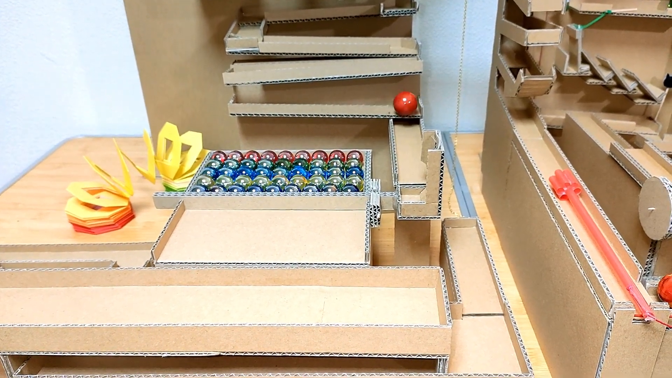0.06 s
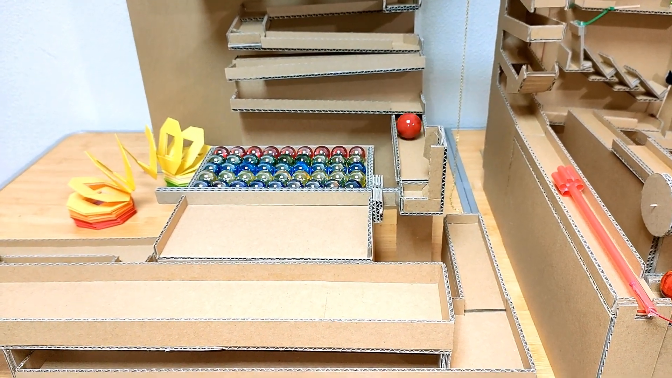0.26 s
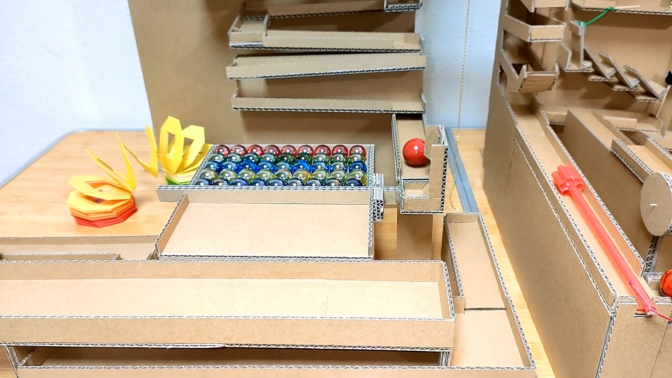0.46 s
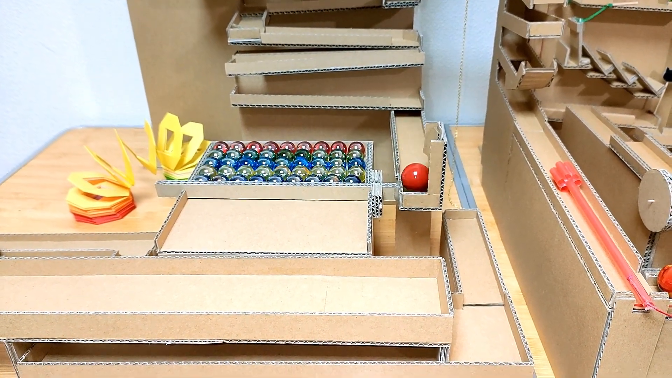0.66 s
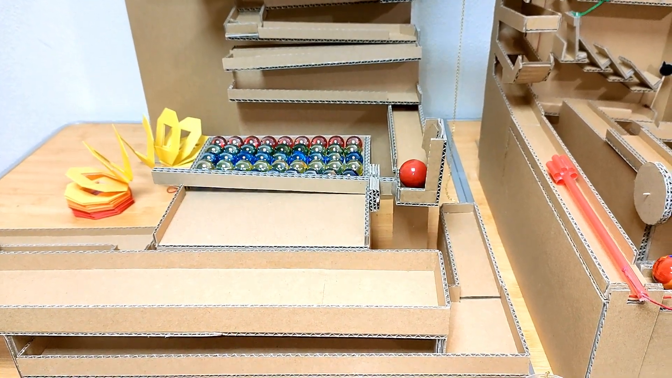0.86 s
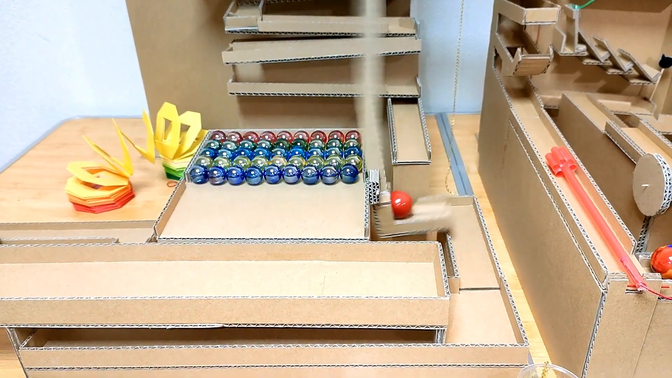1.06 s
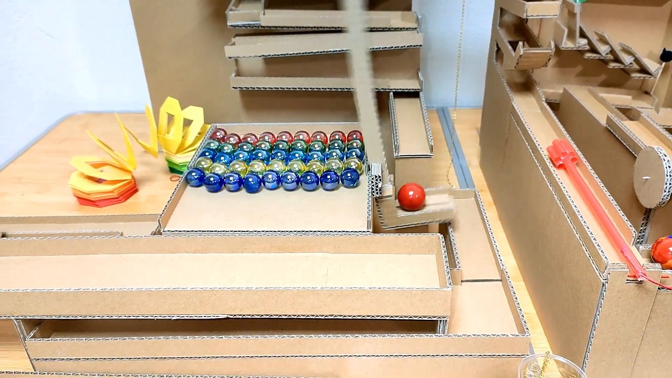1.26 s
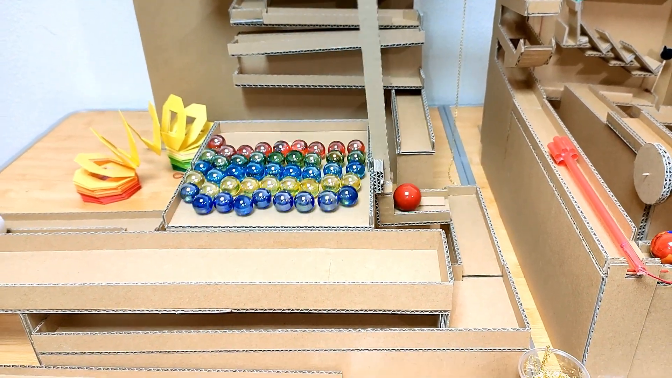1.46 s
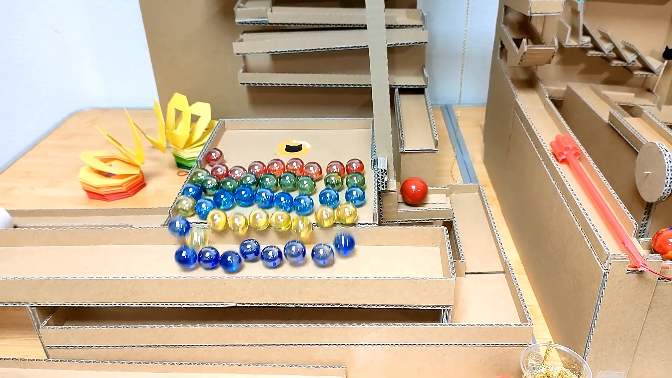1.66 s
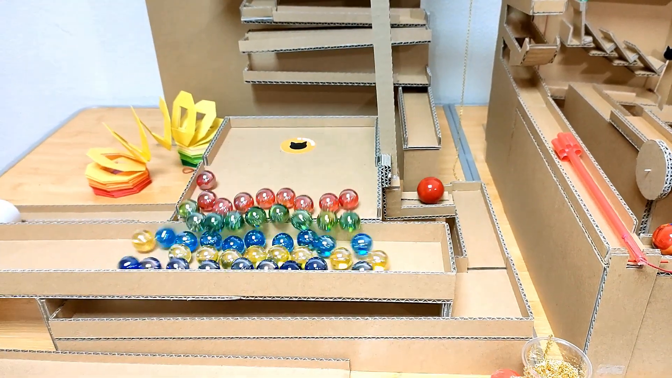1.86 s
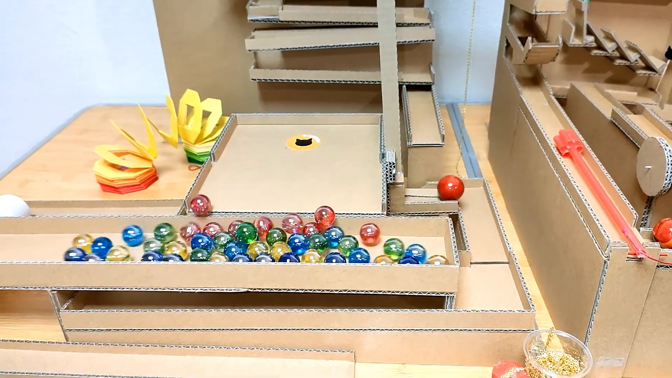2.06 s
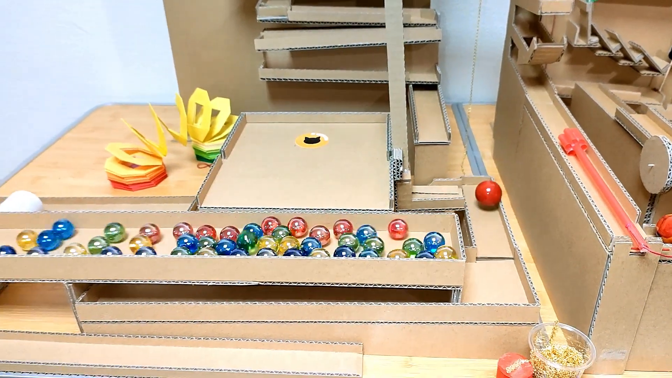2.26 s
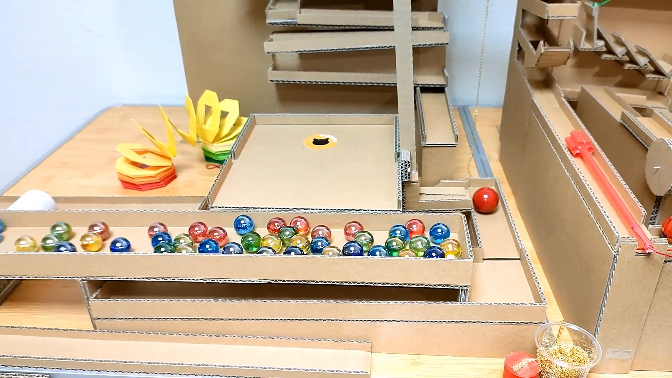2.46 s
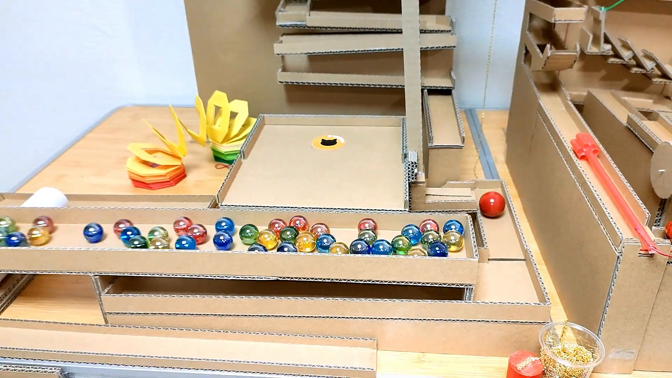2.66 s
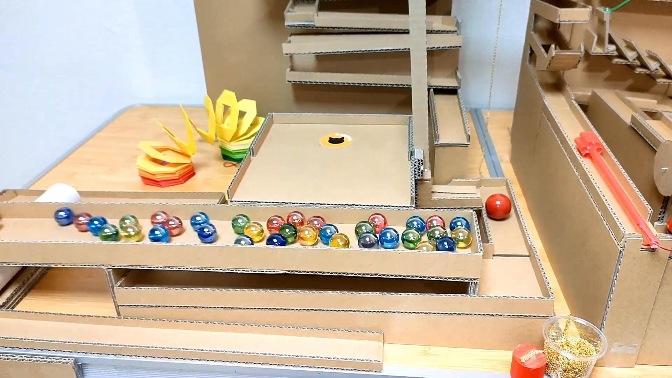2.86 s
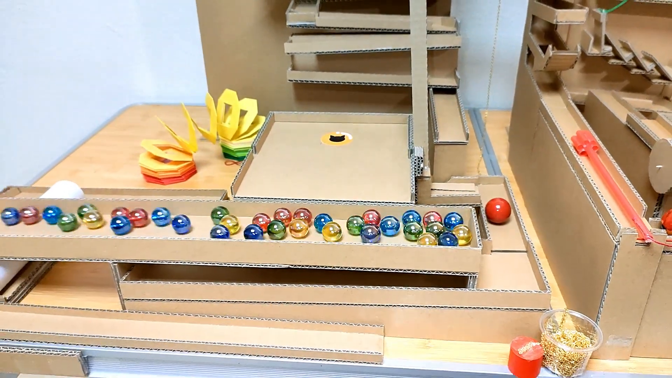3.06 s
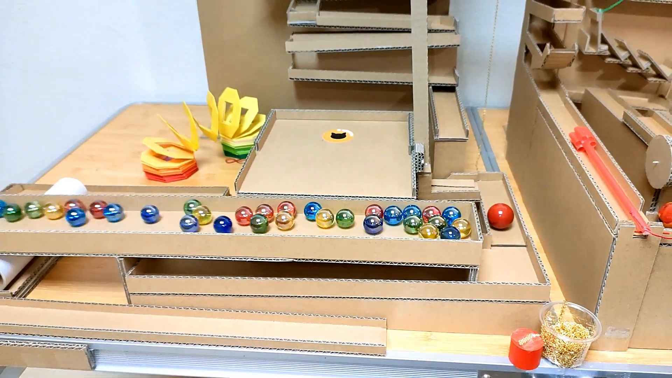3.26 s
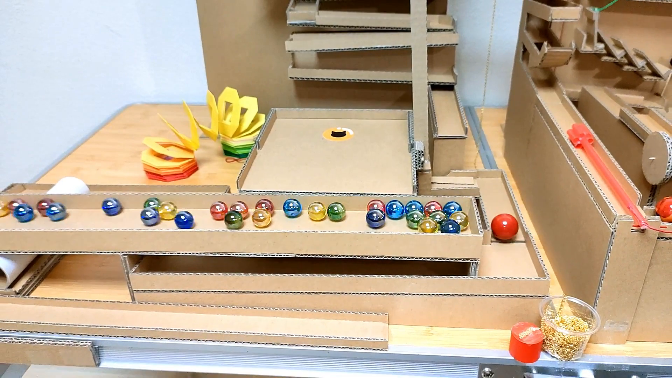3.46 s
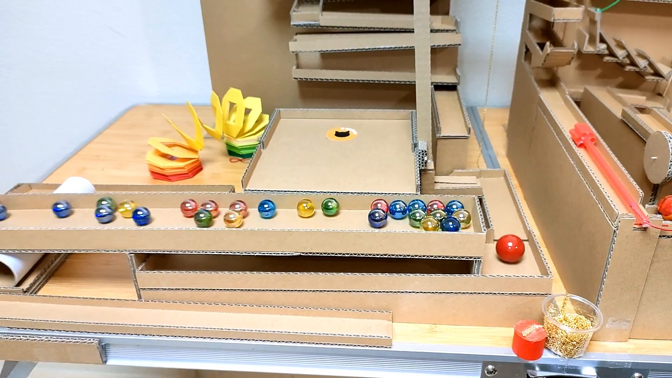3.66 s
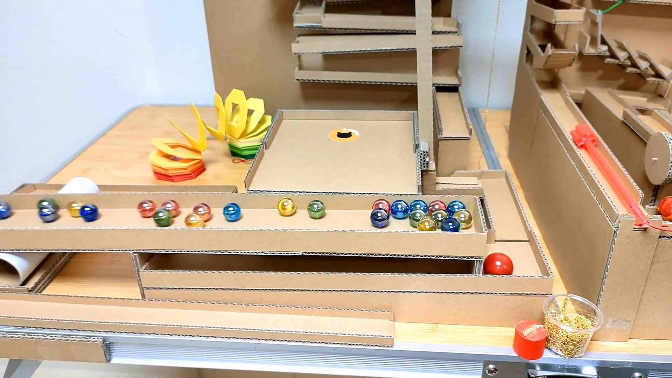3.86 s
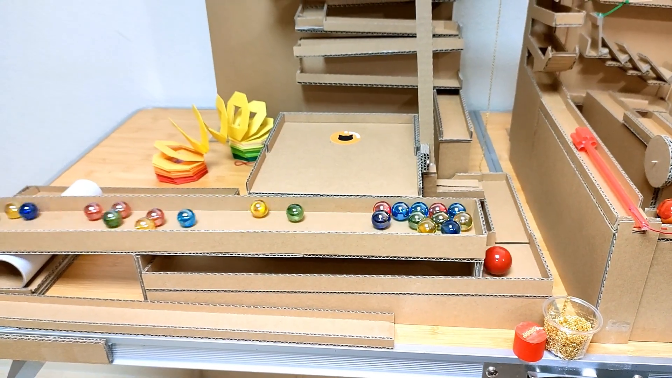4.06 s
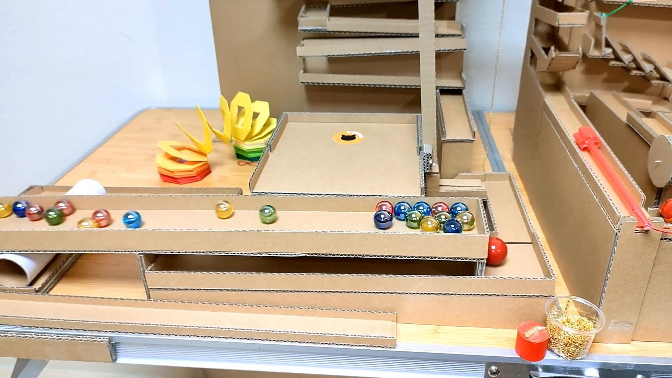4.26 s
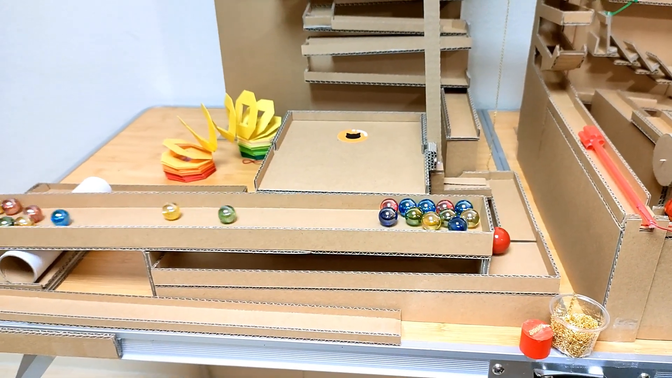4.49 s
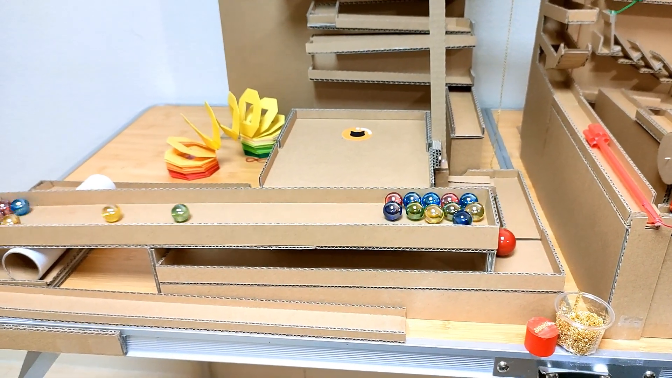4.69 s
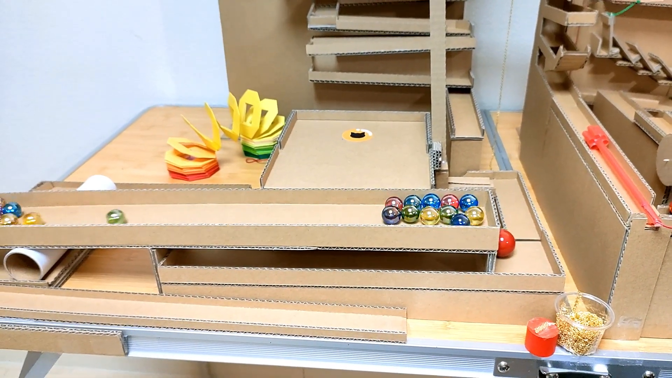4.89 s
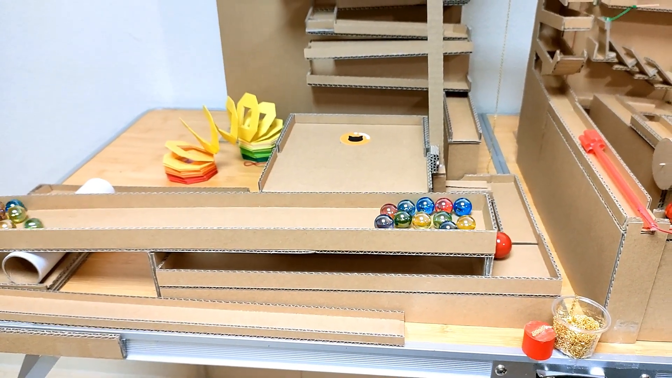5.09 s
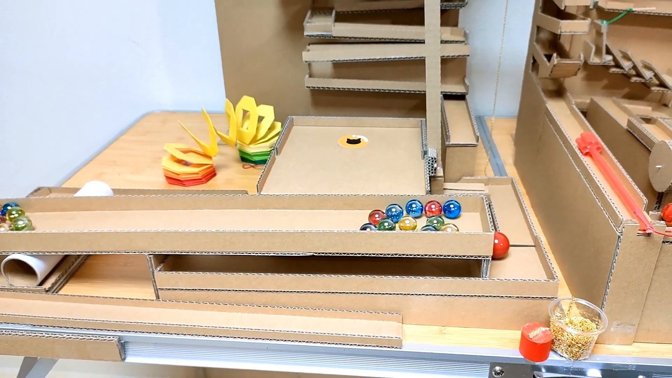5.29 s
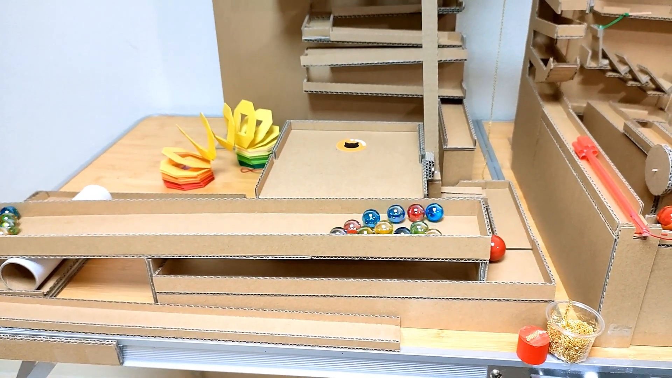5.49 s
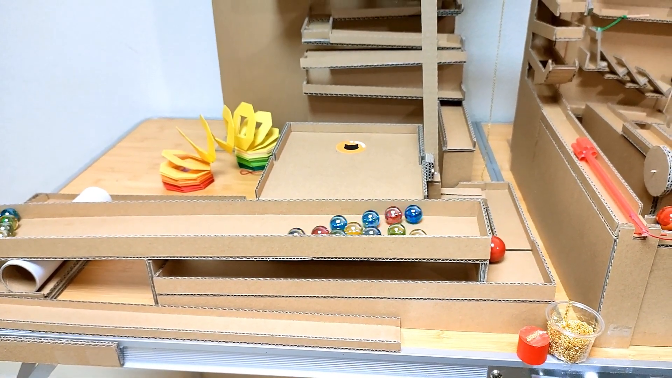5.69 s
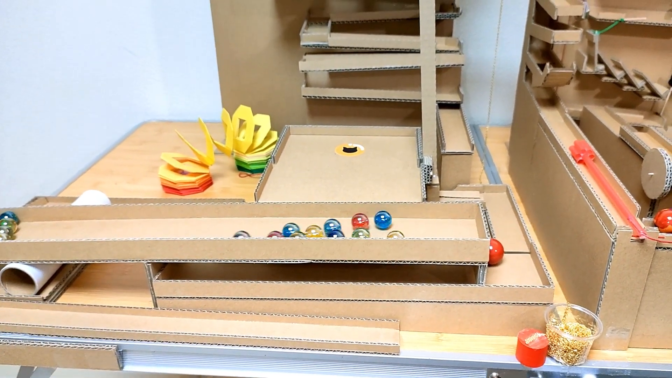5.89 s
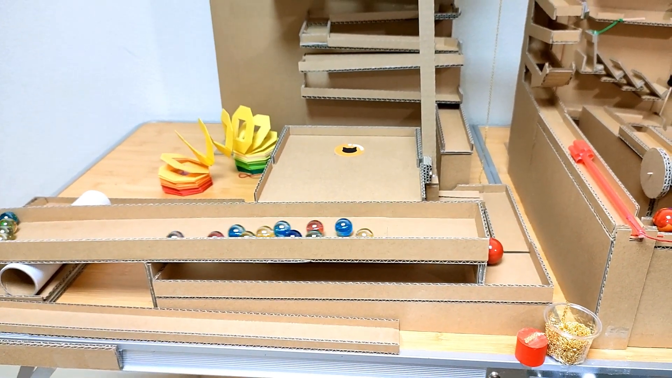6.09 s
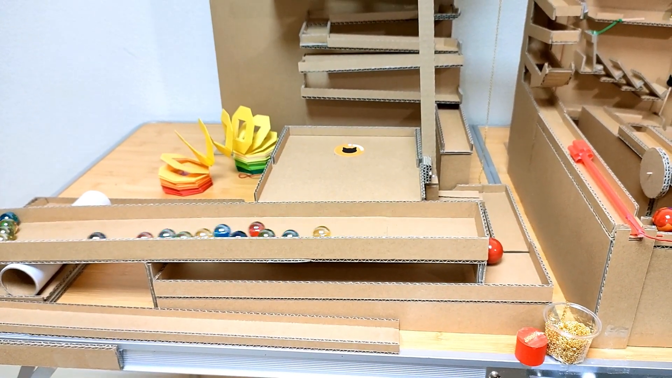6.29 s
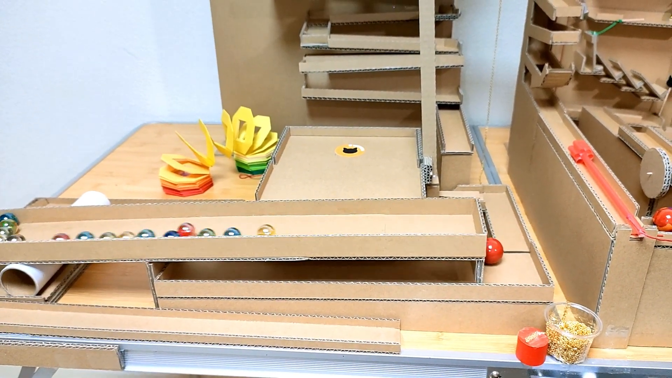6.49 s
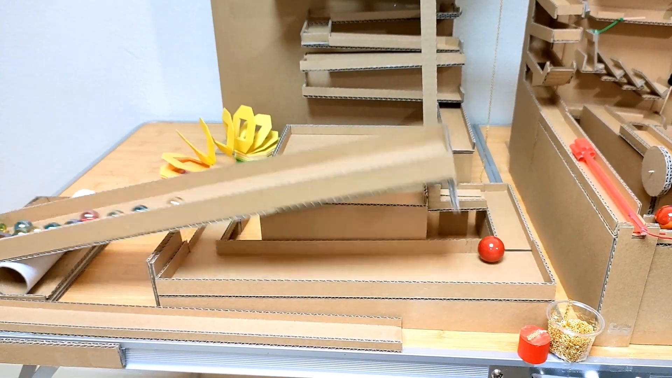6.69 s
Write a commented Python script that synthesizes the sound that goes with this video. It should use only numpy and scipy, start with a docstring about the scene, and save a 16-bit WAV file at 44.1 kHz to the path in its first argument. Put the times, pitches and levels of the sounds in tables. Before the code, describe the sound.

A heavy ball knocks hollowly along a cardboard run and tips a gate. Rows of glass marbles roll down a tray with a swelling hum and spill into a chute in a loud, dense clatter over a low boom. They rumble on and pile up with short bright clicks, which thin out to faint rolling and a few last taps. The sound is close, in a small room.

```python
"""Glass marbles spill down cardboard chutes in a small room, near a phone-sized recorder.
First a heavy ball knocks along the run and tips a gate. From 1.3 s rows of marbles roll down a tray,
then spill out near 1.8 s: blows and rolling ring the cardboard, and the air in a big box booms.
From about 2.9 s they pile up on the right, glass on glass giving short bright clicks. The last ones
roll off with a thin whistle. All along, the recorder's noise suppressor cuts the quiet ends of sounds."""
import sys
import numpy as np
from scipy import signal
from scipy.fft import irfft
from scipy.io import wavfile
from scipy.ndimage import uniform_filter1d

SR = 44100
rng = np.random.default_rng(int(sys.argv[2]) if len(sys.argv) > 2 else 0)


def generate_wav(signal):
    """Clip the signal to [-1, 1] and save it as 16-bit WAV at the path in sys.argv[1]."""
    frames = np.transpose(np.atleast_2d(signal))
    scaled = np.clip(frames, -1, 1) * 32767
    pcm = np.round(scaled).astype(np.int16)
    wavfile.write(sys.argv[1], SR, pcm)


N = 297234
TIME = np.arange(N) / SR

# Room echoes. Each row: pitch in Hz, seconds to fade by 60 dB.
ROOM_FADE = [(150, 0.46), (600, 0.34), (2000, 0.24), (5000, 0.3), (12000, 0.2)]
# Slow rolling over the cardboard's ridges. Each row: time in seconds, whistle level in dB.
WHISTLE = [(5.75, -87), (5.92, -78.5), (6.5, -69), (6.74, -45)]
# Hum of the sloping tray. Each row: pitch in Hz, width in Hz, level in dB.
TRAY_TONES = [(665, 290, -8.5), (1250, 500, -3)]
# The chute's end wall. Each row: pitch in Hz, width in Hz, level in dB relative to the click.
WALL_TONES = [(1140, 31, -24), (2290, 150, -16.5)]
# Hiss of the paper surface. Each row: pitch in Hz, width in Hz, level in dB.
PAPER_TONES = [(2350, 1800, 23), (3690, 1070, 15), (4600, 670, 3.5), (5190, 6700, -24), (6600, 380, -19)]
# Ringing of the chute and tray. Each row: pitch in Hz, width in Hz, level in dB.
CARDBOARD_TONES = [(252, 20.7, -7), (324, 31.6, -4.5), (439.5, 34, -3.5), (532, 50.5, -6.5), (644, 64, 0.5),
                   (739, 72, -1.5), (904.3, 73, 1), (1024.6, 19.4, -12), (1160, 122, 0.5), (1433, 198, 3.5),
                   (1647, 344, 8), (2066, 263, 5.5), (2303, 86, 0)]
# The rolling marbles. Each row: time in seconds, cardboard rumble in dB, box boom in dB.
ROLLING = [(0.0, -107, -100), (1.12, -69, -83), (1.33, -43.5, -58), (1.62, -27, -53), (1.68, -34, -59),
           (1.78, -15, -67), (1.88, -14, -82), (2.242, -17.5, -43), (2.42, -22.5, -35), (2.581, -29, -41.5),
           (2.75, -29, -59.5), (2.92, -22, -48), (3.26, -26.5, -40.5), (3.46, -34.5, -56.5),
           (3.6, -23, -44), (3.76, -36.5, -40), (3.899, -32, -77), (4.03, -33.5, -47), (4.7, -37.5, -67),
           (5.15, -44, -58), (5.3, -59.5, -67), (5.52, -52, -64.5), (5.951, -39.5, -66), (6.74, -38, -68)]
# Brightness of the rumble. Each row: time in seconds, dB per octave above 900 Hz.
RUMBLE_TILT = [(0, -4.5), (1.3, -5.5), (1.6, -2), (2.4, -10), (2.7, -9), (4.5, -6.5), (5.4, 0), (6, -13),
               (6.74, -4.5)]
# The heavy ball jostles loose parts. Each row: start and length in seconds, rattle and boom in dB.
RATTLES = [(0.0, 0.018, -52, -57), (0.305, 0.15, -44.5, -43), (0.647, 0.068, -44, -53.5),
           (0.796, 0.063, -65, -64), (1.196, 0.041, -28.5, -41.5)]
# Blows on cardboard. Each row: start in seconds, level in dB, pitch of the struck spot in Hz,
# paper scuff in dB relative to the blow, left over right in dB.
KNOCKS = [(0.018, -38.5, 322, -30, 3), (0.282, -36.5, 680, -22, -9), (0.29, -19.5, 615, -32, 0),
          (0.31, -16, 590, -25, 3), (0.369, -17, 684, -18, 3), (0.404, -22, 549, -40, -3.5),
          (0.447, -27.5, 617, -27, 3), (0.64, -31, 770.5, -21, 1), (0.687, -29, 440, -21, 3),
          (0.786, -43.5, 736, -11, -3), (0.805, -48, 700.1, -0.5, 1), (0.999, -63, 686, -3, -5),
          (1.074, -38.5, 595, -12.5, 0), (1.181, -16.5, 580, -37, 5.5), (1.197, -13, 580, -29, 0),
          (1.219, -16, 655, -47, -3), (1.393, -22.5, 302, -43, 2), (1.605, -19, 725, -46, -1),
          (1.651, -11, 1090, -49, -1), (1.6625, -18, 1150, -43, 12), (1.6702, -6, 1380, -48, 0),
          (1.6735, -16, 1350, -38, -4), (1.71, -6.5, 1210, -35, -4), (1.717, -10.5, 745, -6, 3),
          (1.7204, -5.5, 800, -46, 4), (1.743, -4, 1500, -15, -1), (1.7448, -6.5, 1320, -32, 2),
          (1.758, -11, 1180, -26, -3), (1.7627, -9.5, 1250, -19, -2), (1.818, -7, 920, -33, -5),
          (1.8375, -2, 1020, -23, -1), (1.897, -3, 840, -22.5, 3), (1.934, -19, 800, -35, 1),
          (1.947, -7, 1100, -34, 0), (1.923, -3.5, 1096, -35, 0.5), (1.941, -10, 910, -28, 0),
          (2.0175, -6.5, 930, -22, 0), (2.06, -16, 1020, -24, 3), (2.073, -3, 1160, -49, -1),
          (2.107, -17, 586, -37, -1), (2.127, -6.5, 694, -30, 0), (2.221, -10, 920, -15, -1),
          (2.24, -8.5, 900, -23, 1.5), (2.254, -4, 840, -25, -4), (2.181, -5.5, 785, -14, 1.5),
          (2.295, -7, 800, -13.5, 1.5), (2.328, -8, 1010, -18, -2), (2.383, -2.5, 990, -18, 1.5),
          (2.694, -20.5, 665, -28, 1), (2.782, -41, 800, -22, 5), (2.861, -26, 902, -10, -1),
          (2.915, -13.5, 945, -14, -3), (2.941, -13, 800, -35, 4), (2.957, -14.5, 936, -25, -2),
          (3.008, -27, 711, -21, 1), (3.047, -19.5, 875, -22, -4), (3.077, -11.5, 880, -30, 2),
          (3.213, -14.5, 900, -32, 2), (3.293, -26, 900, -30, -2), (3.452, -20.5, 903, -12, 4),
          (3.472, -20, 870, -24, -4), (3.574, -24, 1170, -5, 2), (3.649, -23, 1390, -20, 2),
          (3.748, -23.5, 660, -18, 3), (3.888, -20, 1160, -8, 2), (3.944, -16, 580, -12, 2.5),
          (4.066, -34, 1160, -33, 9), (4.142, -26, 2250, -5, -2), (4.179, -28, 1170, -27, -3),
          (4.235, -23.5, 1000, -41, -2), (4.445, -25.5, 2250, -34, -1), (4.521, -27.5, 710, -26, 1.5),
          (4.696, -19.5, 786, -10.5, 1.5), (4.801, -44, 1130, -28, 0), (5.012, -33.5, 475, -13, 3),
          (5.196, -31.5, 2110, -24, 7), (5.23, -24.5, 1050, -15, 1.5), (5.485, -36.5, 630, -16, 4),
          (5.484, -36, 2350, -25, -4), (5.882, -36, 870, -26, -1), (6.007, -40.5, 900, -35, 11),
          (6.064, -34, 2230, -29, -4), (6.186, -31.5, 905, -26, -1), (6.419, -27.5, 1100, -17.5, -2),
          (6.588, -25.5, 2350, -5, -5)]
# Glass on glass. Each row: start in seconds, level in dB, rough pitch in Hz, left over right in dB.
CLICKS = [(1.717, -37, 4320, -28), (1.728, -36, 4340, 0), (1.7866, -28, 4630, -2.5),
          (1.8086, -38, 4600, -1), (1.8318, -29, 3200, 7.5), (1.8645, -21, 4300, 3), (1.896, -12, 4470, 5),
          (1.931, -35, 4320, 1), (2.032, -36, 4430, 5), (2.008, -12.5, 4660, 0), (2.0795, -17, 6500, -5),
          (2.0844, -20, 4090, -4), (2.145, -29, 4630, 4), (2.179, -21, 4670, -3), (2.124, -22, 4600, 3),
          (2.233, -39, 4600, 0), (2.292, -32, 4700, -3), (2.426, -38, 3000, 0), (2.62, -39.5, 3820, 2),
          (2.7396, -39.5, 4880, 4), (2.791, -38, 4650, 3), (2.809, -49, 4600, 0), (2.821, -31, 5060, 7),
          (2.9115, -14, 3780, 7), (2.9155, -21, 4300, -4), (2.9495, -20.5, 5340, -9),
          (2.9577, -23, 4930, 15), (3.014, -22, 6570, 7), (3.023, -24, 5540, -17), (3.033, -22, 4420, 12),
          (3.0535, -16.5, 5170, -1), (3.067, -35, 5450, -4), (3.1567, -25, 5940, 0),
          (3.162, -23.5, 6100, -1), (3.1876, -24, 5440, -4), (3.2116, -23.5, 4270, -8),
          (3.2203, -23, 5200, -2), (3.2258, -21, 5110, 5), (3.234, -36, 5940, 2), (3.243, -21, 5100, -1),
          (3.253, -22, 5900, -5), (3.271, -28, 5500, -3.5), (3.278, -28, 5540, 13), (3.2827, -24, 5600, 4),
          (3.34, -32, 5450, -2), (3.324, -30.5, 6200, 4), (3.44, -28, 3880, 6), (3.4534, -24, 6960, -5),
          (3.4611, -19.5, 5460, 1), (3.517, -32, 6200, -8), (3.469, -25, 5400, -3), (3.56, -30, 5600, 2),
          (3.565, -23, 5600, -5.5), (3.5701, -16, 4600, 8.5), (3.5728, -20.5, 5360, -14),
          (3.601, -18.5, 6300, 5), (3.6267, -18, 4560, 2), (3.636, -26, 5000, 4), (3.7118, -20.5, 5700, 1),
          (3.742, -27, 6160, -2), (3.7793, -31, 3850, 1.0), (3.817, -36.5, 6160, -0.5),
          (3.835, -34, 6130, -2), (3.8743, -23, 5240, 3), (3.8849, -13, 5440, 1), (3.935, -20, 3990, -1),
          (4.0006, -26.5, 4250, -2), (4.0614, -14.5, 4320, 4), (4.0647, -38, 6180, 15),
          (4.127, -42, 5650, 0), (4.166, -36, 4600, 1), (4.1428, -28, 6400, 4), (4.1478, -25, 4600, 2),
          (4.177, -18, 5650, 5), (4.179, -32, 6330, -3), (4.2213, -25.5, 4800, -25), (4.224, -27, 4600, 0),
          (4.2272, -30, 4600, 3), (4.2303, -18, 4400, 15), (4.2344, -16.5, 4600, 3),
          (4.358, -23.5, 6980, 8), (4.405, -26.5, 4960, -3), (4.4262, -33, 4300, 16),
          (4.443, -18.5, 5645, 3), (4.48, -32, 4870, 11), (4.506, -28, 6000, -1), (4.551, -21, 4650, 2),
          (4.6, -20.5, 4447, 2.5), (4.6618, -23, 4450, -2), (4.682, -24, 5230, 0), (4.687, -18.5, 6600, 2),
          (4.7088, -18.5, 4460, 0), (4.7304, -19.5, 4250, 0), (4.79, -24, 6120, -0.5),
          (4.792, -16, 4970, 0), (4.9012, -34.5, 4270, 0), (4.933, -37, 4400, 1), (4.9413, -35, 6400, 0),
          (5.021, -19, 6610, 0), (5.051, -28.5, 3740, 10), (5.0607, -33, 4140, -9), (5.126, -28, 4430, 3),
          (5.212, -31, 4270, 0), (5.2292, -17.5, 4340, 0.5), (5.4408, -49, 4370, 1), (5.4708, -45, 4300, 8),
          (5.5218, -32.5, 4400, 1), (5.574, -44.5, 4540, 0), (5.593, -38, 3500, -2),
          (5.6577, -37.5, 4280, 3), (5.738, -46.5, 5200, 3), (5.933, -41, 5200, 9.5),
          (5.967, -44.5, 4550, 3), (6.2457, -39.5, 4600, 0), (6.585, -17.5, 4600, 2.5),
          (6.6723, -21.5, 4280, 1), (6.685, -23, 5060, 4), (6.6985, -20.5, 6360, 0), (6.71, -37, 4600, 7),
          (6.723, -27, 5600, 11)]
# How walls and microphone colour the clicks. Each row: pitch in Hz, gain in dB.
CLICK_COLOUR = [(1500, -2), (2800, -7.5), (4200, -2), (6500, 1.5), (7600, -7.5), (8800, -1), (10500, -9),
                (14500, -13), (15600, -37), (16400, -51)]
# A click and its three ever weaker rebounds. Each entry: level change in dB.
REBOUND_DB = [0, -9, -12, -17]
# When clicks come from the heap. Each row: start and end in seconds.
HEAP_SPANS = [(2.85, 5.8), (6.52, 7)]

HEAP_LAG, TRAY_LAG = 22, -2  # samples by which the left microphone hears clicks late
RUMBLE, BOOM = 0, 1  # which level to read from ROLLING and RATTLES


def gain_of(db):
    """Turn decibels into a multiplier."""
    return 10 ** (np.asarray(db) / 20)


def evened(x):
    """Scale a signal to an average power of one."""
    return x / np.sqrt(np.mean(x ** 2) + 1e-20)


def read_at(table, hz):
    """Read between a table's rows on a musical pitch scale."""
    pitches, values = np.transpose(table)
    return np.interp(np.log(hz + 1), np.log(pitches + 1), values)


def pulses(start, size, pan_db=0, lag=0):
    """Sharp pushes in stereo; the left side is pan_db louder and lag samples later."""
    out = np.zeros((2, N + 64))
    at = np.clip(np.round(start * SR).astype(int), 32, N - 1)
    np.add.at(out[0], at + np.round(lag).astype(int), size * gain_of(pan_db / 2))
    np.add.at(out[1], at, size * gain_of(-pan_db / 2))
    return out[:, :N]


def ring(x, hz, width):
    """Each push rings at one pitch; the greater the width, the sooner it dies."""
    decay, angle = np.exp(-np.pi * width / SR), 2 * np.pi * hz / SR
    return signal.lfilter([0, np.sin(angle)], [1, -2 * decay * np.cos(angle), decay * decay], x)


def fade(x, fade_s):
    """Give each push a smoothly dying tail."""
    return signal.lfilter([1], [1, -np.exp(-1 / (fade_s * SR))], x)


def random_hits(level, count, spread_db):
    """Times, sizes and sides of many hits, mostly small, that follow a level curve."""
    when, rarity, side = rng.random((count, 3)).T
    size = gain_of(-spread_db * np.log(np.maximum(rarity, .01)))
    size = level[(when * N).astype(int)] * evened(size) * np.sqrt(N / count)
    return when * N / SR, size, 2 * side - 1


def at_heap(time):
    """One while the clicks come from the heap, otherwise zero."""
    return sum((time > start) & (time < end) for start, end in HEAP_SPANS)


def roll_level(kind):
    """How strongly the rolling marbles drive the rumble or the boom."""
    time, *db = np.transpose(ROLLING)
    return gain_of(np.interp(TIME, time, db[kind]))


def rattle_level(kind, rise_s=0.01, fall_s=0.0081):
    """Each rattle comes up quickly, holds, and dies away."""
    start, length, *db = np.transpose(RATTLES)
    age = TIME[:, None] - start
    shape = np.exp(np.minimum(np.minimum(age / rise_s, 0), (length - age) / fall_s))
    return shape @ gain_of(db[kind])


def shake_level(kind):
    """Rolling and rattling shake the run together."""
    return roll_level(kind) + rattle_level(kind)


def spill_level(start_s=1.795, full_s=1.8204, until_s=2.06):
    """The marbles all knock together as the tray empties: rise, hold, fall."""
    rise_db = 72 * np.minimum((TIME - full_s) / (full_s - start_s), 0)
    fall_db = 69 * np.maximum(TIME - until_s, 0)
    return gain_of(-28.5 + rise_db - fall_db)


def after_clicks(db, fade_s):
    """A level that jumps at each click of glass and dies away."""
    start, click_db = np.transpose(CLICKS)[:2]
    return fade(pulses(start, gain_of(click_db + db))[0], fade_s)


def echoes():
    """Scattered reflections off the walls, each pitch dying at its own speed."""
    taps, slots = np.zeros((2, SR // 2)), np.arange(84, SR // 2 - 12, 12)
    at = slots + rng.integers(0, 12, (2, len(slots)))
    np.put_along_axis(taps, at, rng.choice([-1., 1.], at.shape), 1)
    hz, age, bands = signal.stft(taps, SR, nperseg=256)
    alike = np.clip((700 / (hz[:, None] + 1)) ** 2 + 0.014, 0, 1)  # long waves reach both sides alike
    bands[1] = alike * bands[0] + np.sqrt(1 - alike ** 2) * bands[1]
    bands *= 1 + 1.57 * np.exp(-age / 0.0021)  # near walls and the table answer first and strongest
    bands *= gain_of(-60 * age / read_at(ROOM_FADE, hz)[:, None])
    tail = signal.istft(bands, SR, nperseg=256)[1]
    return tail / np.linalg.norm(tail[0])


def room(x, drift_hz=3.1):
    """The marbles keep moving, so the sound drifts among three sets of echoes."""
    turn = 2 * np.pi * drift_hz * TIME
    shares = [np.sqrt(2 / 3) * np.cos(turn + k * np.pi / 3) for k in range(3)]
    return sum(signal.oaconvolve(x * share, echoes(), axes=1)[:, :N] for share in shares)


def box_boom(hz=153.6, width=19):
    """Blows and shaking keep the air in the big box booming on one low note."""
    start, db = np.transpose(KNOCKS)[:2]
    thumps = ring(pulses(start, gain_of(db - 53))[0], hz, width)
    drone = ring(np.gradient(rng.standard_normal(N)), hz, width)
    return thumps + shake_level(BOOM) * evened(ring(drone, hz, width=27))


def whistle():
    """The last marbles roll slowly over the cardboard's ridges with a thin, fuzzy tone."""
    level = gain_of(np.interp(TIME, *np.transpose(WHISTLE), left=-200))
    return level * evened(ring(rng.standard_normal((2, N)), hz=4560, width=130))


def tray_hum(start_s=1.28, end_s=1.66, rise_db_per_s=55):
    """Fine bumps under the rolling rows hum in the tray floor, louder as they gather speed."""
    level = gain_of(-34 + rise_db_per_s * (TIME - end_s)) * (TIME > start_s) * (TIME < end_s)
    middle, side = rng.standard_normal((N, 2)).T * uniform_filter1d(level, size=900)
    bumps = np.array([middle + 0.17 * side, middle - 0.17 * side])
    return sum(gain_of(db) * ring(ring(bumps, hz, width), hz, width) * (4 * np.pi * width / SR) ** 1.5
               for hz, width, db in TRAY_TONES)


def end_wall(travel_s=0.00303):
    """Each click in the heap pushes through the marbles and rings the wall behind them."""
    start, db, _, pan_db = np.transpose(CLICKS)
    stray_db = 1.3 * rng.standard_normal((len(start), len(WALL_TONES)))
    sizes = gain_of(db + stray_db.T) * at_heap(start)
    return sum(gain_of(tone_db) * ring(pulses(start + travel_s, size, pan_db, HEAP_LAG), hz, width)
               for size, (hz, width, tone_db) in zip(sizes, WALL_TONES))


def paper_crackle():
    """High up, the paper snaps at each blow and rustles finely under rolling glass."""
    start, db, _, scuff_db, pan_db = np.transpose(KNOCKS)
    snaps = fade(pulses(start, gain_of(db + scuff_db - 16.5), pan_db), fade_s=0.00059)
    left, right, grit = rng.standard_normal((N, 3)).T
    grit_db = 7.1 * np.minimum(evened(uniform_filter1d(grit, size=40)), 2)
    rustle = gain_of(-45.5) * shake_level(RUMBLE) * evened(gain_of(grit_db))
    band = signal.butter(3, [8500, 14200], "band", fs=SR, output="sos")
    return signal.sosfilt(band, np.array([left, right]) * (snaps + rustle))


def paper_hiss():
    """The paper surface hisses under moving glass and scuffs briefly at each blow."""
    start, db, _, scuff_db, pan_db = np.transpose(KNOCKS)
    scuffs = fade(pulses(start, gain_of(db + scuff_db), pan_db), fade_s=0.0029)
    left, other, grit = rng.standard_normal((N, 3)).T
    grit = gain_of(5.9 * evened(uniform_filter1d(grit, size=60)))
    noise = np.array([left, .5 * left + np.sqrt(.75) * other])
    hiss = sum(gain_of(tone_db) * evened(ring(noise, hz, width)) for hz, width, tone_db in PAPER_TONES)
    rush = gain_of(-26) * roll_level(RUMBLE) + gain_of(-28) * spill_level()
    rush += gain_of(-23.5) * rattle_level(RUMBLE)  # loose parts scrape the paper
    rush += after_clicks(db=-27, fade_s=0.023)
    band = signal.butter(3, [2000, 7300], "band", fs=SR, output="sos")
    return signal.sosfilt(band, evened(hiss) * (scuffs + rush * evened(grit)))


def slaps(dent_s=0.001):
    """Once dented, the struck spot swings a few times at its own pitch."""
    start, db, spot_hz, _, pan_db = np.transpose(KNOCKS)
    pitches = np.geomspace(300, 2400, num=13)
    nearest = abs(np.log(spot_hz[:, None] / pitches)).argmin(axis=1)
    out = 0
    for k, hz in enumerate(pitches):
        blows = pulses(start + dent_s, gain_of(db - 1.5) * (nearest == k), pan_db)
        dents = ring(blows, hz, width=hz) * 2 * np.pi * hz / SR
        out += ring(dents, hz, width=0.45 * hz)
    return out


def cardboard():
    """Blows and the bumps of rolling ring the panels, each spot with its own mix of tones."""
    start, db, spot_hz, _, pan_db = np.transpose(KNOCKS)
    bump_s, bump_size, side = random_hits(shake_level(RUMBLE), count=8000, spread_db=3.5)
    db_per_octave = np.interp(bump_s, *np.transpose(RUMBLE_TILT))
    out = 0
    for hz, width, tone_db in CARDBOARD_TONES:
        near_db = np.maximum(-7 * np.log2(hz / spot_hz) ** 2, -18)  # tones far from the spot's are weak
        late_s = rng.uniform(0, 0.00286, len(start))  # bends travel slowly, so panels answer in turn
        size = gain_of(db - 10.5 + near_db) * rng.choice([-1, 1], len(start))
        blows = pulses(start + late_s, size, pan_db)
        tilt_db = db_per_octave * max(np.log2(hz / 900), 0)
        tilt_db += 9.9 * min(np.log2(hz / 550), 0)  # small bumps hardly move the large, low panels
        push = gain_of(tilt_db - 33.5) * bump_size * rng.standard_normal(len(bump_s))
        bumps = pulses(bump_s, push, pan_db=6.7 * side, lag=5 * side - 3)
        out += gain_of(tone_db) * ring(blows + bumps, hz, width)
    dent = np.hanning(9)  # soft board spreads each push over a fifth of a millisecond
    return signal.oaconvolve(out, dent[None] / dent.sum())[:, :N]


def tick(hz, cycles, width_share):
    """One touch of glass: a few swings around one pitch that swell and die quickly."""
    age = np.arange(256) / SR * hz / cycles
    burst = ring(rng.standard_normal(len(age)) * age * np.exp(-3 * age), hz, width_share * hz)
    return burst / np.linalg.norm(burst) * np.sqrt(SR / hz)


def colour_clicks(clicks, left_echo_s=0.000374, right_echo_s=0.000323):
    """The board throws each click back upside down; walls and microphone shape its tone."""
    hz = np.fft.rfftfreq(256, 1 / SR)
    echo = 1 - 0.19 * np.exp(-2j * np.pi * hz * np.array([[left_echo_s], [right_echo_s]]))
    colour = np.fft.fftshift(irfft(gain_of(read_at(CLICK_COLOUR, hz)) * echo), axes=1)
    return signal.oaconvolve(clicks, colour, "same", axes=1)


def rebounds(typical_wait_s=0.0034):
    """Each marble strikes, then bounces three times against its neighbours."""
    start, db, hz, pan_db = np.transpose(CLICKS)[:, :, None]
    waits = typical_wait_s * (.6 + .9 * rng.random((len(start), 3)))
    after_s = np.cumsum(np.c_[np.zeros(len(start)), waits], axis=1)
    stray = rng.uniform(-1, 1, after_s.shape)
    stray[:, 0] = 0  # only the rebounds stray in pitch and size
    loose_db = -7.5 * (after_s > 0) * (1 - at_heap(start))  # few neighbours away from the heap
    size = gain_of(db + 3.5 + REBOUND_DB + loose_db + 4.3 * stray)
    return start + after_s, size, hz * (1.05 + 0.23 * stray), np.repeat(pan_db, 4)


def glass():
    """Marbles click together; the spill and each click stir up fine chatter among the neighbours."""
    stir = spill_level() + after_clicks(db=-18.5, fade_s=0.026)
    chatter_s, chatter_size, side = random_hits(stir, count=6000, spread_db=1.0)
    height = rng.random(len(chatter_s))  # 0 is the lowest pitch, 1 the highest
    chatter_size *= gain_of(-13.5 + 4.8 * height * (1 - at_heap(chatter_s)))  # near clicks stay bright
    start, size, hz, pan_db = rebounds()
    start, size = np.append(start, chatter_s), np.append(size, chatter_size)
    hz, pan_db = np.append(hz, 3300 * 3.0 ** height), np.append(pan_db, 2.3 * side)
    lag = np.where(at_heap(start), HEAP_LAG, TRAY_LAG) + 2.2 * rng.standard_normal(len(start))
    bright = gain_of(rng.uniform(-9, 4, len(start)))  # a glancing hit is duller than a square one
    pitches = np.geomspace(3000, 12000, num=24)
    nearest = abs(np.log(hz[:, None] / pitches)).argmin(axis=1)
    out = 0
    for k, pitch in enumerate(pitches):
        body = tick(pitch, 7.4, 0.28) + 0.12 * tick(pitch, 23, 0.46) + 0.3 * tick(pitch * 0.44, 2.14, 1)
        top = 0.56 * tick(pitch * 1.47, 11, 0.2) + 0.8 * tick(pitch * 2.77, 9.9, 0.47)
        for shape, share in ((body, 1), (top, bright)):
            hits = pulses(start, share * size * (nearest == k), pan_db, lag)
            out += signal.oaconvolve(hits, shape[None])[:, :N]
    return colour_clicks(out)


def scene():
    """Cardboard, glass and box sound together, and the room echoes the first two."""
    card = cardboard() + slaps() + paper_hiss() + paper_crackle() + end_wall() + whistle() + tray_hum()
    clicks = glass()
    echo_share = gain_of(np.where(at_heap(TIME), -7, -9))  # the heap is farther off, so it echoes more
    return card + clicks + box_boom() + room(gain_of(-0.5) * card + echo_share * clicks)


def record(dry, quiet_db=-92, top_hz=16400):
    """The recorder thins the bass, turns down quiet pitches and cuts the highest treble."""
    bass_cut = signal.butter(6, 140, "high", fs=SR, output="sos")  # small microphone holes lose bass
    thinned = 0.094 * dry + signal.sosfilt(bass_cut, dry)
    bands = signal.stft(thinned, SR, nperseg=512, noverlap=384)[2]
    power = (abs(bands) ** 2).mean(0)
    power = uniform_filter1d(uniform_filter1d(power, size=9, axis=0), size=5, axis=1)
    under_db = np.maximum(quiet_db - 10 * np.log10(abs(power) + 1e-20), 0)
    bands *= gain_of(-np.minimum(0.4 * under_db, 25))
    kept = signal.istft(bands, SR, nperseg=512, noverlap=384)[1][:, :N]
    squeezed = 1.2 * np.tanh(kept / 1.2)  # softens the loudest blows
    treble_cut = signal.firwin(511, top_hz, window=("kaiser", 9), fs=SR)
    return signal.oaconvolve(squeezed, treble_cut[None], "same")


dry = scene()
out = record(dry)
generate_wav(out)
```